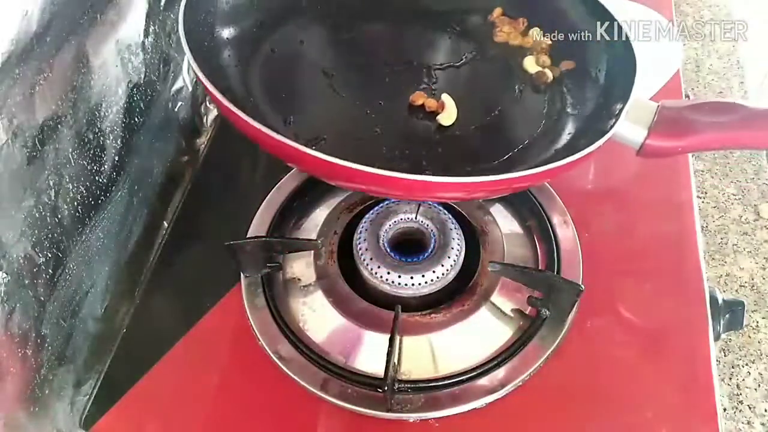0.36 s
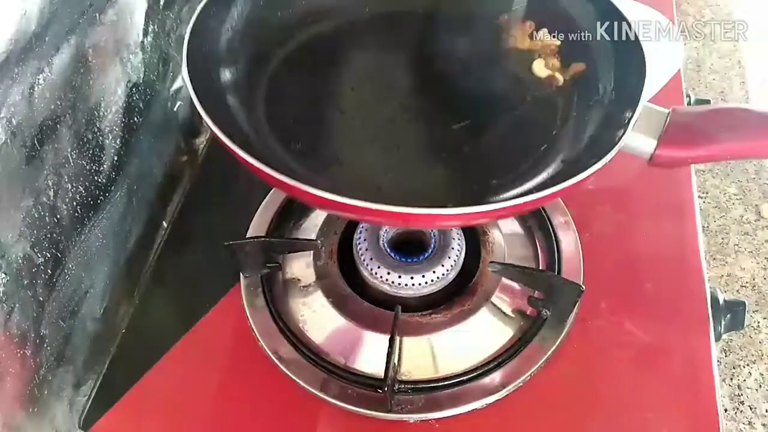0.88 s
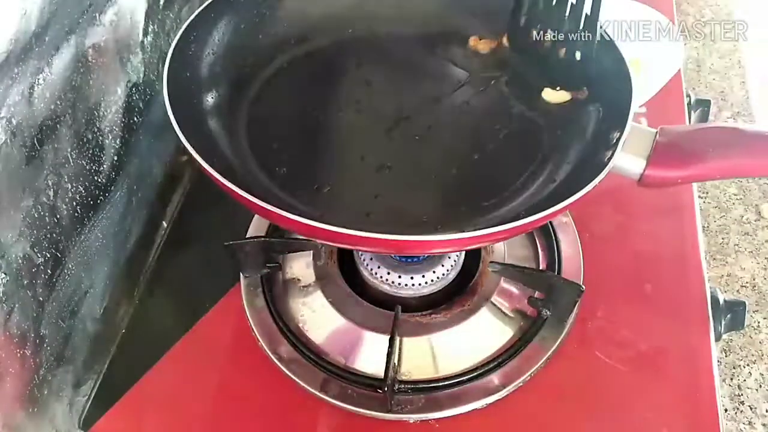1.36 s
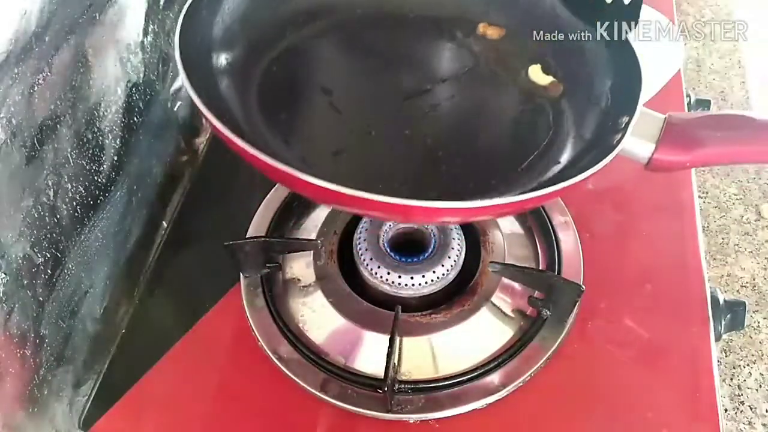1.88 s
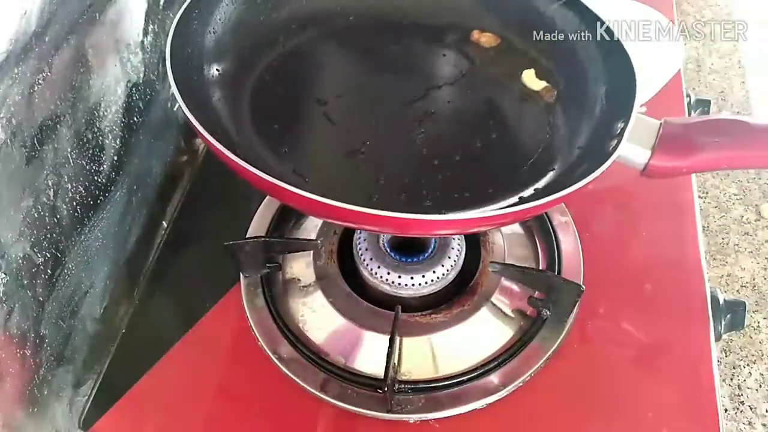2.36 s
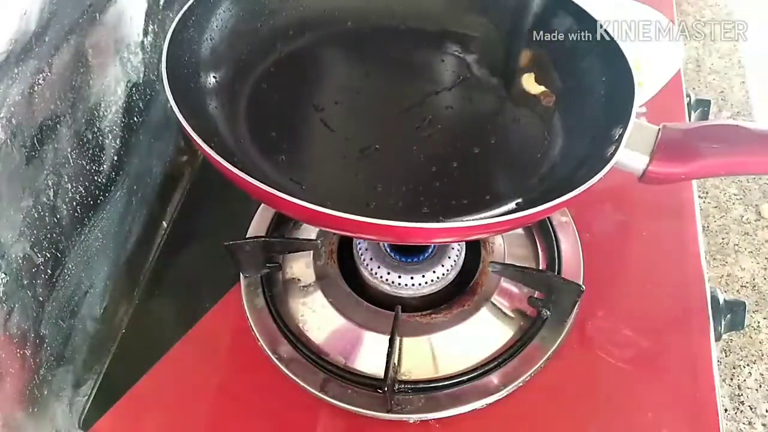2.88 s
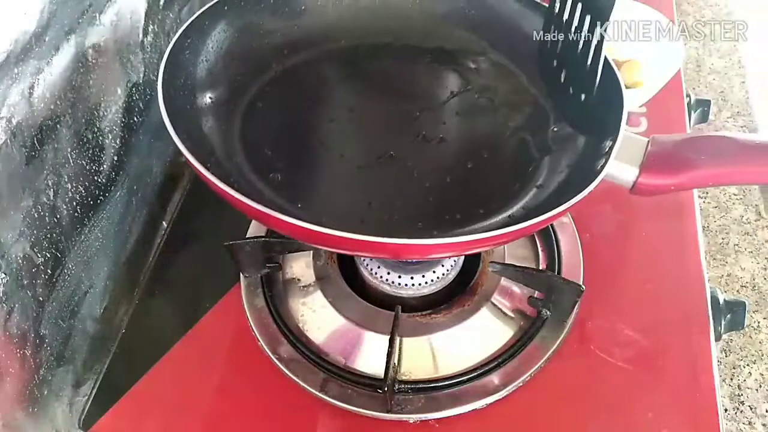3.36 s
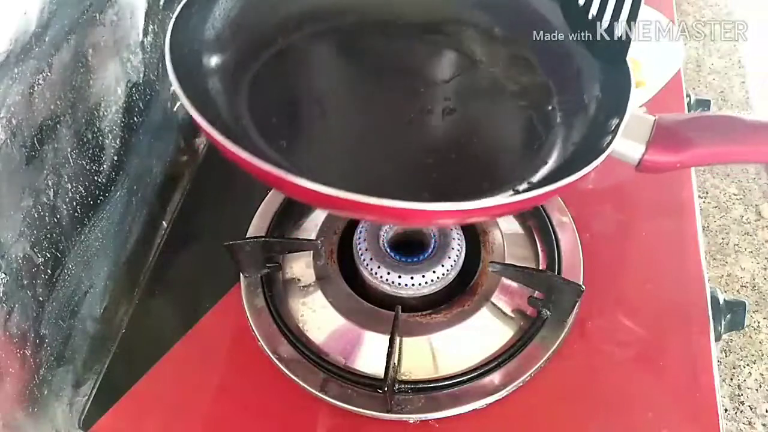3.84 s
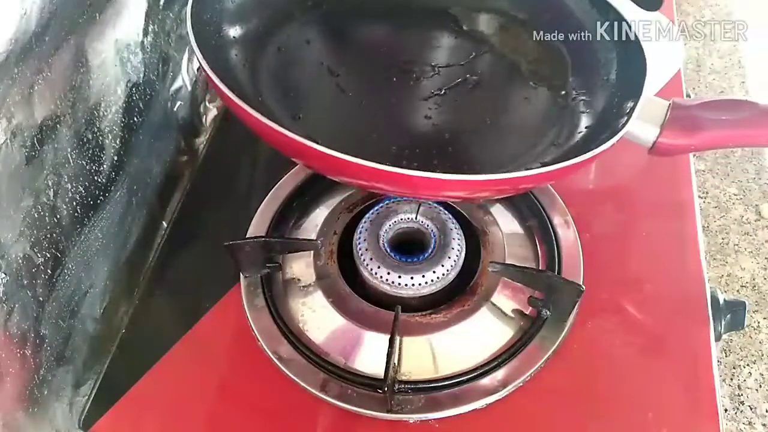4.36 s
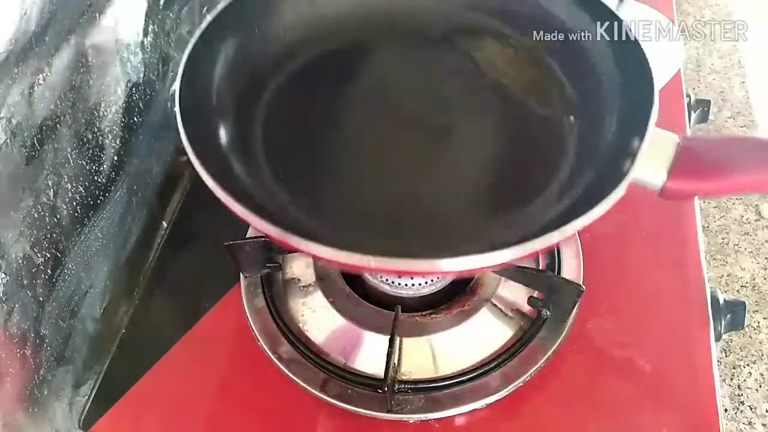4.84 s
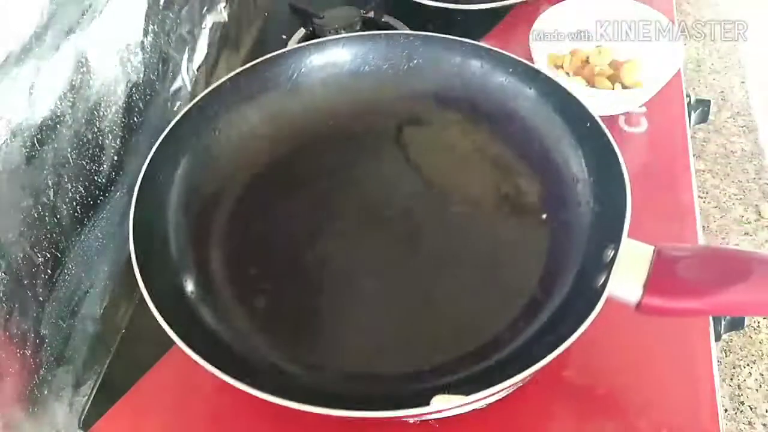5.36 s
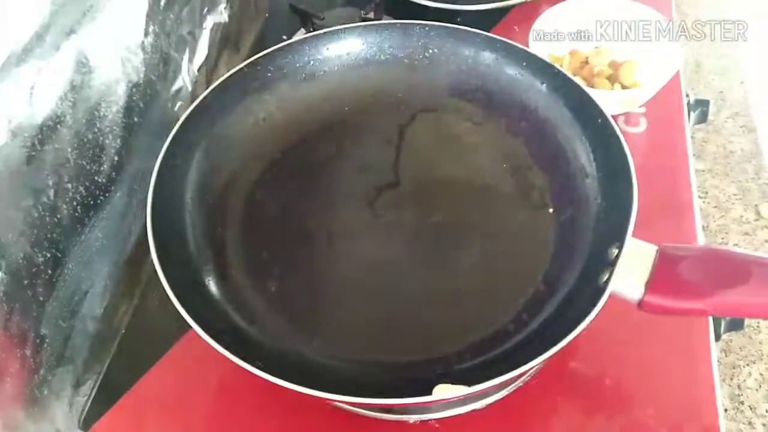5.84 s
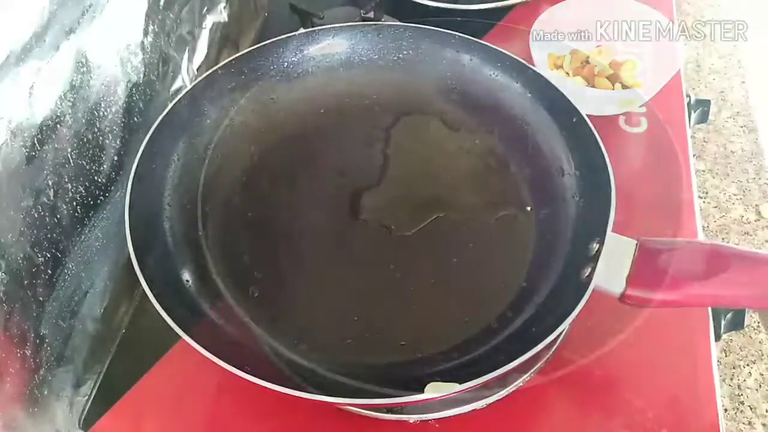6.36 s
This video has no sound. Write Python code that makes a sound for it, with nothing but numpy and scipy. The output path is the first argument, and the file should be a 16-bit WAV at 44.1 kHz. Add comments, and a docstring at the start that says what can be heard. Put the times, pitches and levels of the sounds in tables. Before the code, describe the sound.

Close stereo sound of cooking fat: thin, clumpy sizzling and crisp high pops, with small dry taps of a spatula on the pan. The taps are busiest in the first three seconds, sparser afterwards. Snapping cracks come midway, and a firm low knock starts a short clatter after five seconds. A quiet gas flame rumbles beneath, and the hard kitchen adds a short reflective tail.

```python
"""From the first instant hot ghee spits in a metal pan: pitched noise bursts over a clumped fizz of small ones.
Light spatula taps tick in the air and ring the pan's modes; a low rumble of shaped noise is the gas flame.
The pan stand knocks lower, chattering noise pushes, once early on; dry noise cracks join from about 2 s.
Between 5.3 and 5.9 s the knocks come thick, then a last run of spits. A small hard kitchen answers throughout.
Two microphone ports hear it; narrow bands far under the loudest one nearly drop out."""
import sys
import numpy as np
from scipy import signal
from scipy.fft import rfft, irfft
from scipy.io import wavfile
from scipy.ndimage import uniform_filter1d

SR = 44100
rng = np.random.default_rng(int(sys.argv[2]) if len(sys.argv) > 2 else 0)


def to_wav(s):
    """Save 16-bit WAV."""
    ch = np.atleast_2d(s).T  # columns
    pcm = np.round(np.clip(ch, -1, 1) * 32767)  # PCM
    wavfile.write(sys.argv[1], SR, pcm.astype(np.int16))


def how_loud(loudness_db):
    """Turn decibels into a plain amplitude multiplier (0 dB gives 1, 20 dB gives 10)."""
    steps = np.asarray(loudness_db, float) / 20
    return 10 ** steps


N = 285768  # samples

# Levels of single events are set before the pan, the room and the ports colour them.
# large bubble bursts: start_s, level_db, pitch_hz
POPS = [(0.0448, -24.5, 7460), (0.3131, -20.5, 5950), (0.51, -26, 6450), (0.6239, -15.5, 5800),
        (0.6657, -15, 6750), (0.7946, -23.5, 4500), (0.8856, -23, 7440), (0.9016, -17, 8400),
        (0.9331, -20.5, 7300), (1.1285, -24.5, 4380), (1.174, -21.5, 6150), (1.2265, -20.5, 4620),
        (1.2532, -22, 4840), (1.2791, -13.5, 6900), (1.4035, -21, 5900), (1.449, -18.5, 6880),
        (1.5427, -19, 7260), (1.5665, -18, 5980), (1.5995, -25, 4500), (1.6325, -14.5, 6300),
        (1.9097, -20, 3700), (2.016, -15.5, 7070), (2.1014, -20, 8700), (2.1728, -19.5, 6440),
        (2.462, -22.5, 4960), (2.834, -19.5, 7090), (2.892, -17, 6060), (3.08, -21.5, 7140),
        (3.1346, -23.5, 6040), (3.252, -19.5, 5870), (3.581, -21, 6700), (3.7445, -27.5, 6200),
        (3.768, -21, 4200), (3.8737, -22, 6200), (4.1433, -18, 5300), (4.2145, -19, 6970),
        (4.2898, -20.5, 6550), (5.1357, -21.5, 6200), (5.2026, -24, 5570), (5.2672, -19, 5430),
        (5.3269, -24.5, 5900), (5.418, -17, 6440), (5.455, -21, 6480), (5.5889, -20.5, 5870),
        (5.6155, -18.5, 7480), (5.6692, -17.5, 6680), (5.7837, -19.5, 7000), (5.863, -19, 7380),
        (5.94, -12.5, 6470), (5.973, -16, 6700), (6.08, -20.5, 6950), (6.118, -20, 5930),
        (6.2124, -18, 6710), (6.4002, -32, 5560), (6.468, -19.5, 5800)]
# course of the small bursts: start_s, level_db, kick_level_db (their kicks into the pan)
FIZZ = [(0, -42, -55), (.6, -44.5, -54), (1.15, -36.5, -45), (1.36, -39.5, -62), (1.74, -37, -55),
        (2.2, -36.5, -52), (2.55, -45, -46), (3.1, -38.5, -57), (3.3, -43.5, -93), (3.502, -44.5, -69.5),
        (3.62, -42.5, -56.5), (4.1, -40, -57.5), (4.399, -42, -53.5), (4.65, -38, -54), (5.301, -51, -55.5),
        (5.919, -42, -58), (6.48, -42.5, -54)]
# dry cracks of spattering fat: start_s, level_db, lowest_hz
CRACKS = [(2.0196, -13.5, 3960), (2.779, -16, 1010), (3.071, -9, 3030), (3.074, -6, 1050),
          (3.0883, -14.5, 1220), (3.1292, -15, 1240), (3.254, -11.5, 3500), (5.4092, -3, 3280),
          (5.5413, -3, 2190), (5.7837, -10, 1380)]
# light taps on the bare metal: start_s, level_db, centre_hz
TAPS = [(0.004, -17, 2610), (0.019, -13, 3530), (0.2192, -12.5, 2610), (0.282, -18.5, 1700),
        (0.5112, -13.5, 3650), (0.632, -14, 2350), (1.0155, -16, 3640), (1.072, -18.5, 2670),
        (1.095, -19, 1720), (1.6381, -10.5, 3490), (1.765, -12, 2450), (1.8091, -13, 2470),
        (1.91, -10, 2420), (1.9423, -10, 3160), (2.047, -15, 3210), (2.114, -20, 2650), (2.159, -24, 2040),
        (2.224, -21, 3400), (2.2822, -16, 4000), (2.42, -13.5, 3180), (2.579, -25, 1710),
        (2.792, -19, 3340), (2.885, -13.5, 2640), (2.8842, -26, 1390), (3.505, -25, 3310),
        (3.5934, -17.5, 3270), (3.7427, -19.5, 3270), (4.157, -10.5, 3600), (4.265, -21, 2650),
        (4.284, -12.5, 3180), (4.364, -18, 3300), (4.384, -15.5, 2524), (4.688, -29, 2610),
        (4.8786, -14, 2850), (4.9406, -14.5, 3190), (4.968, -22, 3230), (5.032, -16.5, 2270),
        (5.1446, -19.5, 3100), (5.3829, -16, 2490), (5.588, -19.5, 1370)]
# knocks of the pan stand: start_s, level_db, lowest_hz, hardness (relative bandwidth, no unit)
KNOCKS = [(.722, -36.5, 589, 0.31), (2.576, -42, 380, 0.62), (4.827, -41.5, 800, 0.14),
          (5.383, -19, 495, 0.84), (5.572, -28.5, 458, 0.45), (5.598, -38, 543, 1),
          (5.762, -24.5, 466, 0.74), (5.833, -26, 454, 0.61)]
# pan modes, from the whole swinging body up to bottom and wall: pitch_hz, relative_level_db, t60_s
PAN = [(236.5, 8.5, 0.1), (340, -2.5, 0.039), (603, -15.5, 0.18), (681.5, -2.5, 0.055), (800, -20, 0.097),
       (917.8, -13, 0.12), (1331.5, -16, 0.35), (1902, -13.5, 0.14), (2210, -21.5, 0.29), (2610, -8, 0.14),
       (2999, -4.5, 0.07), (3357, 2, 0.026), (3960, 2.5, 0.028), (4268, -7.5, 0.031), (4620, -8.5, 0.036),
       (5405, -11.5, 0.11), (6200, 0.5, 0.056), (6710, -20.5, 0.063), (7480, 7, 0.016), (8645, 2, 0.021)]
# reverberation of the kitchen: frequency_hz, t60_s
KITCHEN = [(300, 0.86), (1500, 0.76), (5000, 0.48), (12000, 0.42)]
# spectrum of the flame: frequency_hz, relative_level_db
FLAME = [(25, -20), (60, -8), (85, 2), (100, 0.5), (119, 3.5), (135, 6), (165, -11), (250, -15.5),
         (330, -28), (1500, -51.5)]
# colour shared by both ports: frequency_hz, gain_db
MIC = [(100, -1), (7000, 1.5), (9000, -3.5), (12000, -8), (14300, -7), (16300, -64)]
# balance of the ports: frequency_hz, left_minus_right_db
LEFT = [(100, -3), (500, -3.5), (2000, -4), (5000, 0.5), (8500, -10), (13000, -5)]
# level against the loudest band around which a band drops into a hole: frequency_hz, threshold_db
HOLES = [(300, -53), (1300, -35), (3000, -26), (9500, -25), (12500, -23)]


def read(points, hz):
    """Joins (Hz, value) points on a log-frequency axis."""
    f, value = np.transpose(points)
    return np.interp(np.log(hz + 1), np.log(f + 1), value)


def evened(x):
    """Scales to rms 1."""
    return x / np.sqrt(np.mean(x ** 2) + 1e-20)


def add(mix, s, sound):
    """Lays a sound into the mix at time s, cut off at the end."""
    part = mix[..., round(s * SR):][..., :sound.shape[-1]]
    part += sound[..., :part.shape[-1]]


def highpass(x, hz):
    """Third-order low cut."""
    return signal.sosfilt(signal.butter(3, hz, "highpass", fs=SR, output="sos"), x)


def puff(hz, width, decay_s, alike, rise_s=0.00092):
    """Dying noise in a band around hz, peak 1; the two ports hear it only partly alike."""
    t = np.arange(768) / SR
    envelope = np.exp(-t / decay_s) * (1 - np.exp(-t / rise_s))
    a, b = rng.standard_normal((2, 768)) * envelope
    alike = np.clip(alike, -1, 1)
    pair = np.array([a, alike * a + np.sqrt(1 - alike ** 2) * b])
    edges = np.clip([hz / (1 + width), hz * (1 + width)], 100, 20000)
    band = signal.butter(3, edges, "bandpass", fs=SR, output="sos")
    out = signal.sosfilt(band, pair)
    return out / abs(out).max()


def burst(hz):
    """A bubble bursts: a pitched spit that stutters, some spray, and a duller kick of the fat on the metal."""
    spit = puff(hz, 0.15 * rng.uniform(0.24, 1.84), 0.0031, 0.013, 0.00014)
    spray = puff(8860, 0.93, 0.006, 0.14, 0.0002)
    spit = spit + how_loud(-6.5) * spray
    for late in rng.integers(60, 450, 2):  # samples
        stutter = puff(hz * rng.uniform(0.724, 1.355), 0.11, 0.0025, 0.21, 0.00034)
        spit = spit + how_loud(-7.5) * np.roll(stutter, late, axis=1)
    kick = puff(3190, 0.9, 0.0023, 0.32, 0.00051)
    return spit, kick


def pops():
    """Large steam bubbles burst one by one, each a pitched spit."""
    out = np.zeros((2, N))
    for s, db, hz in POPS:
        spit, _ = burst(hz)
        add(out, s, how_loud(db) * spit)
    return out


def fizz():
    """Many small bursts of random size and pitch, coming in clumps; returns their spits and kicks."""
    median_per_s, lowest_hz, highest_hz, kinds = 600, 4388, 10810, 14
    s, db, kick_db = np.transpose(FIZZ)
    t = np.arange(N) / SR
    clumps = how_loud(5.5 * evened(uniform_filter1d(rng.standard_normal(N), 900)))
    happens = rng.random(N) < median_per_s * clumps / SR
    size = how_loud(16.9 * np.minimum(rng.exponential(1, N), 2.5)) * happens
    kind = rng.integers(0, kinds, N)
    spits, kicks = 0, 0
    for k, hz in enumerate(np.geomspace(lowest_hz, highest_hz, num=kinds)):
        here = (size * (kind == k))[None]
        spit, kick = burst(hz)
        spits = spits + signal.oaconvolve(here, spit, axes=1)[:, :N]
        # only the larger bursts kick hard
        kicks = kicks + signal.oaconvolve(here ** 1.5, kick, axes=1)[:, :N]
    spits = how_loud(np.interp(t, s, db)) * evened(spits)
    kicks = how_loud(np.interp(t, s, kick_db)) * evened(kicks)
    return spits, kicks


def cracks():
    """Very short dry clicks in the air, wide from their lowest Hz up to 13.5 kHz; they miss the metal."""
    out = np.zeros((2, N))
    for s, db, low_hz in CRACKS:
        wide = np.sqrt(13500 / low_hz)
        add(out, s, how_loud(db) * puff(low_hz * wide, wide - 1, 0.00019, 0.38, 0.0001))
    return out


def ring(x, modes, db, direct_db, roam):
    """Pushes ring the pan's modes, each by chance of where they land; high modes reach the ports out of phase."""
    out = how_loud(direct_db) * x
    for hz, mode_db, t60 in modes:
        turn = rng.choice([-1, 1, 1]) * np.array([[1], [-1]]) * min(hz / 4000, .8)  # radians
        pole = how_loud(-60 / t60 / SR) * np.exp(2j * np.pi * hz / SR)
        # the landing place moves every 400 samples, and with it the grip on the mode
        spots = np.repeat(rng.standard_normal(N // 400 + 1), 400)[:N]
        place = uniform_filter1d(np.cos(roam * spots), size=120)
        swing = signal.lfilter([1], [1, -pole], x.mean(0) * place + 1e-18)
        out = out + how_loud(db + mode_db) * (np.exp(1j * turn) * swing).imag
    return out


def taps():
    """Spatula taps: a wide tick in the air, and one clean push into the pan's middle modes."""
    ticks, pushes = np.zeros((2, 2, N))
    t = np.arange(400) / SR
    for s, db, hz in TAPS:
        add(ticks, s, how_loud(db - 9.5) * puff(0.97 * hz, 0.74, 0.00097, 0.59, 0.00011))
        push = np.exp(-t * hz / 4.07) * np.sin(2 * np.pi * hz * t)  # dies over about four cycles
        add(pushes, s, how_loud(db) * push)
    rung = ring(pushes, PAN[5:15], -33.0, -22.0, roam=0.62)
    return ticks + highpass(rung, 1050)


def knocks():
    """Short pushes that chatter on the contact; a harder blow starts faster and reaches higher."""
    out = np.zeros((2, N))
    for s, db, low_hz, hard in KNOCKS:
        hard = np.clip(hard, .05, 2)
        delays_s = np.cumsum(rng.uniform(0.003232, 0.0096, 4))
        for k, late in enumerate(delays_s):
            blow = puff(low_hz * (1 + hard), hard, 0.0052 / hard ** 0.52, 0.6, 0.00047 / hard ** 1.3)
            # the first blow is on time, each later one 20.5 dB weaker
            add(out, s + late * (k > 0), how_loud(db - 20.5 * k) * blow)
    return out


def kitchen(x):
    """Sparse echoes of random sign, one in every 20 samples, each band dying at its own speed."""
    echoes = np.zeros((2, SR))
    at = np.arange(200, SR - 20, 20) + rng.integers(0, 20, (2, (SR - 201) // 20))
    np.put_along_axis(echoes, at, rng.choice([-1., 1.], at.shape), 1)
    hz, t, z = signal.stft(echoes, SR, nperseg=256)
    decay = how_loud(-60 * t / read(KITCHEN, hz)[:, None])
    tail = signal.istft(z * decay, SR, nperseg=256)[1]
    return signal.fftconvolve(x, tail / np.linalg.norm(tail[0]), axes=1)[:, :N]


def flame():
    """The gas flame rumbles as low shaped noise, nearly the same at both ports, the right a little louder."""
    a, b = rng.standard_normal((2, N))
    colour = how_loud(read(FLAME, np.fft.rfftfreq(N, 1 / SR)))
    rumble = irfft(rfft([a + 0.033 * b, a - 0.41 * b]) * colour, N)
    return how_loud(-56.5) * evened(rumble)


def scene():
    """Bursts, cracks, taps and knocks with the pan they ring, the room around it, the flame underneath."""
    spits, kicks = fizz()
    near = ring(pops() + spits, PAN[11:], -26.5, 0, roam=1.83)
    near = near + ring(kicks, PAN[5:14], -20.0, 1.0, roam=1.216)
    near = near + cracks() + taps()
    near = near + ring(knocks(), PAN[:10], -24.0, 4.5, roam=0.92)
    return near + how_loud(-5.0) * kitchen(near) + flame()


def spectral_holes(x):
    """Leaves holes in the spectrum: narrow bands far under the loudest band of the moment nearly drop out."""
    hz, _, z = signal.stft(x, SR, nperseg=2048, noverlap=1024)
    # 128 bands of 8 bins for each port
    power = (abs(z[:, :1024].reshape(2, 128, 8, -1)) ** 2).mean(2)
    level_db = 10 * np.log10(power + 1e-16)
    loudest_db = uniform_filter1d(level_db, 5, axis=1).max(1, keepdims=True)
    over_db = level_db - loudest_db - read(HOLES, hz[4::8])[:, None]
    keep = np.clip(over_db / 2 + .5, .06, 1)  # fades over 2 dB, never fully empty
    z = z * np.pad(np.repeat(keep, 8, axis=1), ((0, 0), (0, 1), (0, 0)))
    return signal.istft(z, SR, nperseg=2048, noverlap=1024)[1][:, :N]


def top_cut(x):
    """Nothing passes above the cut-off."""
    return signal.sosfilt(signal.butter(12, 16510, fs=SR, output="sos"), x)


def record(dry):
    """Colour and balance of the two microphone ports."""
    hz = np.fft.rfftfreq(N, 1 / SR)
    ports = how_loud(read(MIC, hz) + np.outer([.5, -.5], read(LEFT, hz)))
    mix = irfft(rfft(dry) * ports, N)
    return top_cut(mix)


dry = scene()
out = record(dry)
to_wav(out)
```